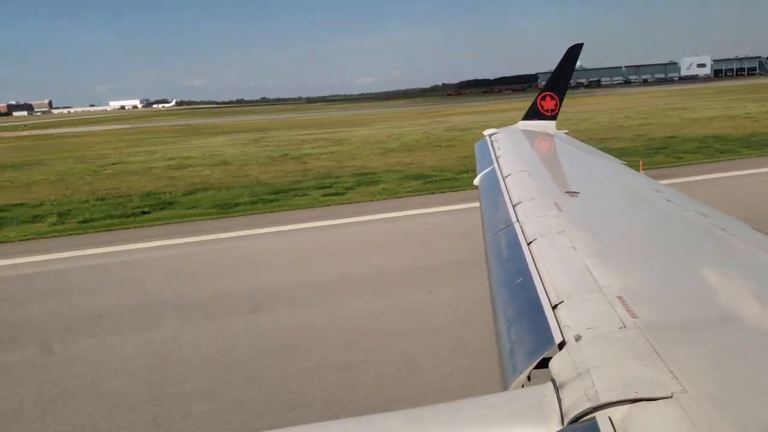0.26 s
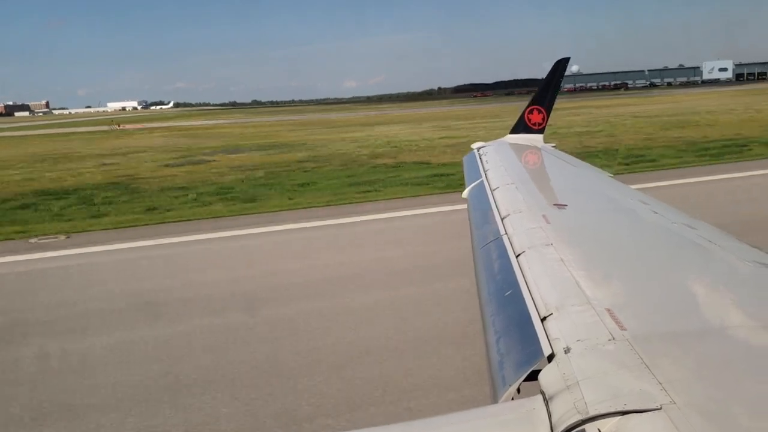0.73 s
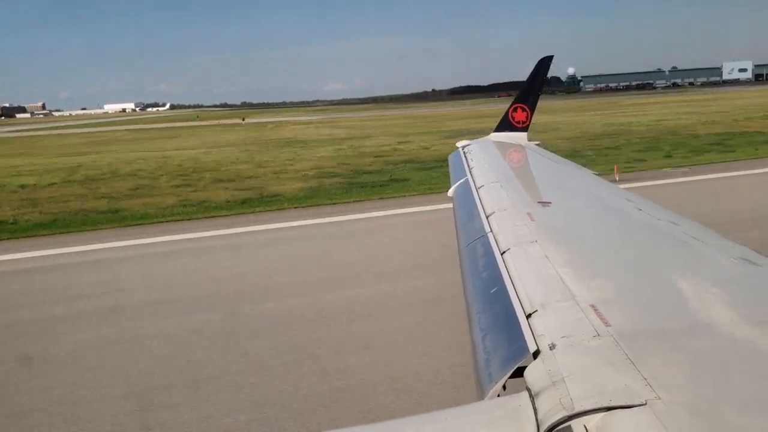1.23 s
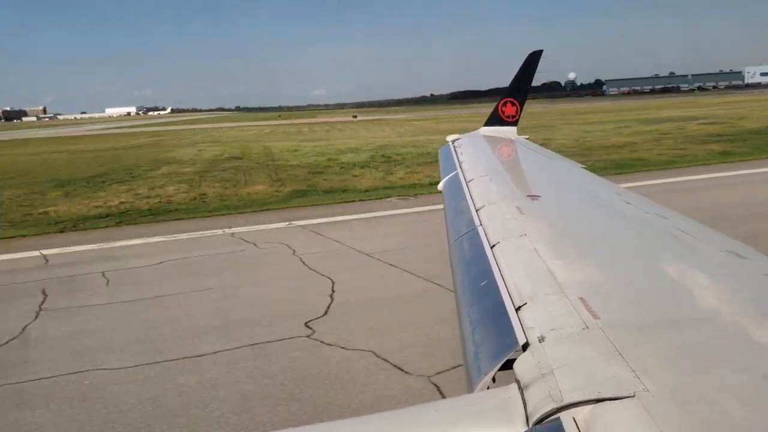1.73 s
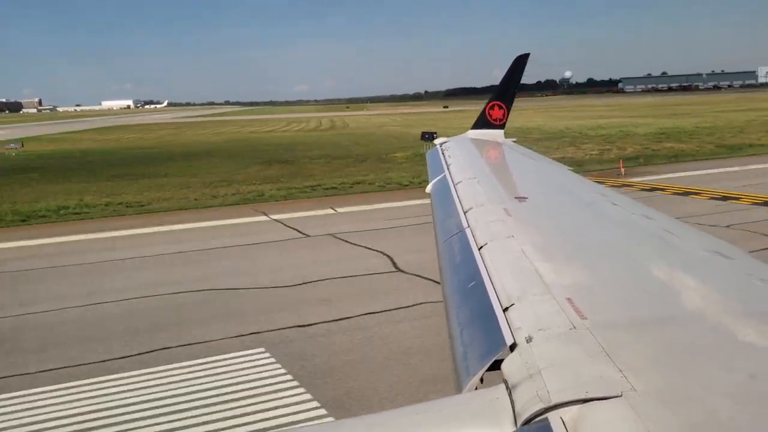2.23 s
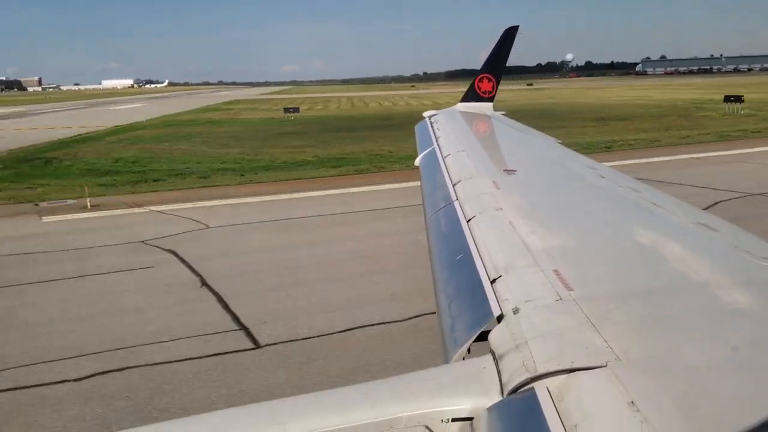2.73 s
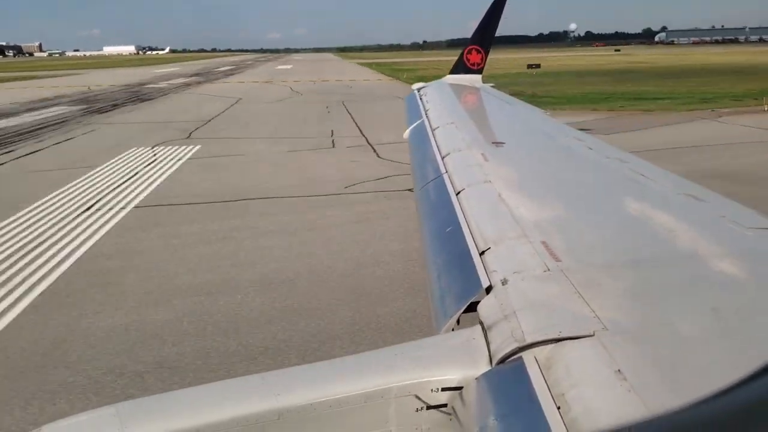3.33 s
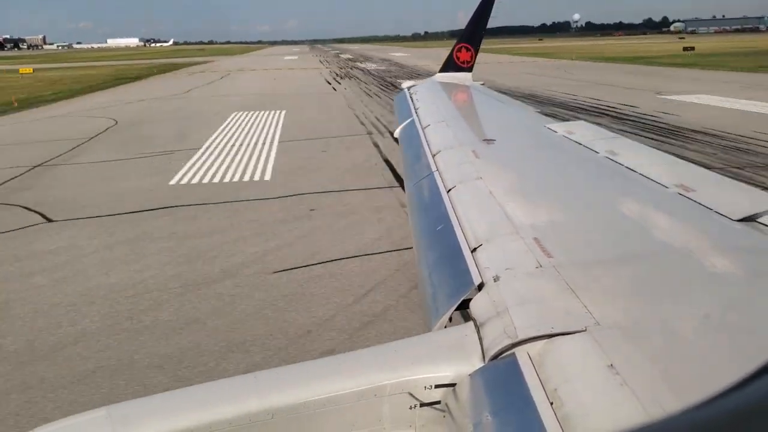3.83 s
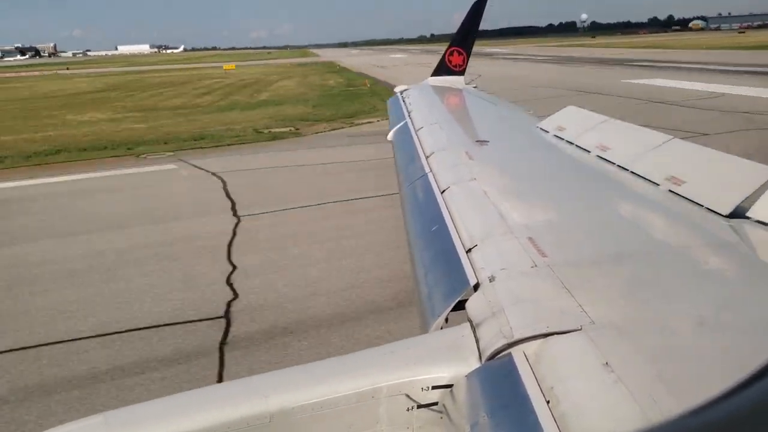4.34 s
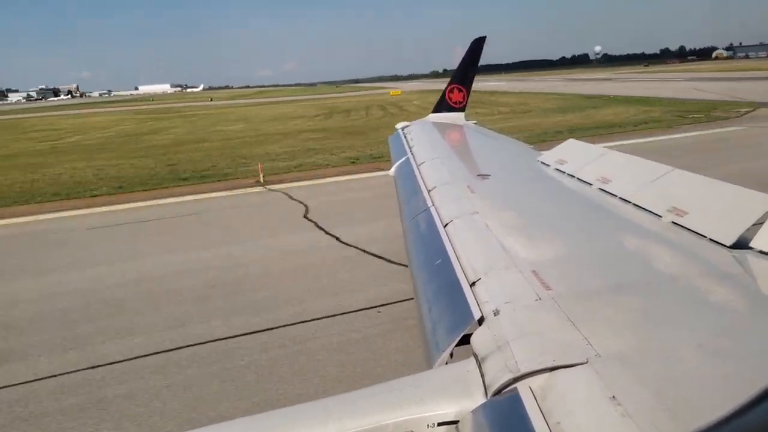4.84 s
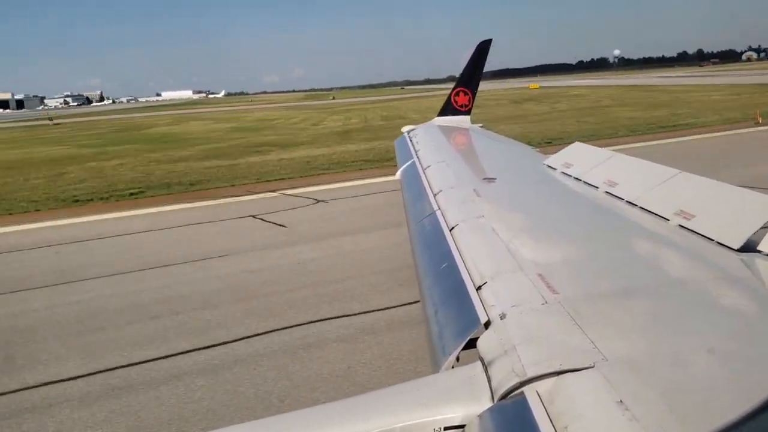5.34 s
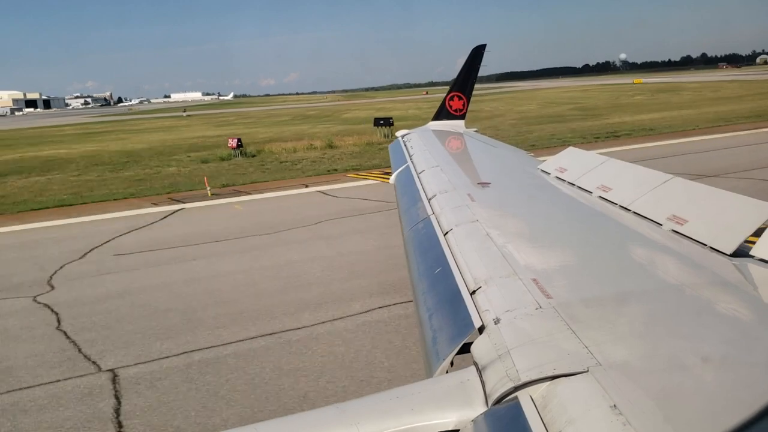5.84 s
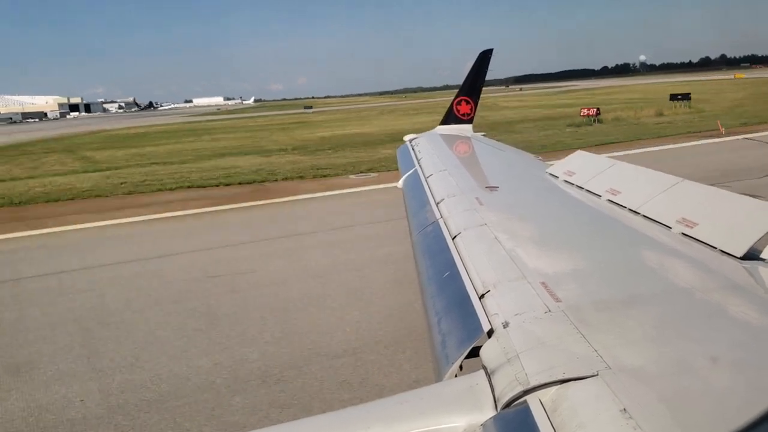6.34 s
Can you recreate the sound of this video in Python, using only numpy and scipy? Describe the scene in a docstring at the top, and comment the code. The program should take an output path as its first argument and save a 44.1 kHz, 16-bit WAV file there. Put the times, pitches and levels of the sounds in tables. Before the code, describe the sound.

Low hull booms and short thumps over steady engine rumble and airy hiss, with loose trim ticking left as an airliner rolls after landing.

```python
"""Jet cabin at touchdown

Heard beside the window through two microphone ports: the wheels roll and two low hull resonances boom unevenly.
Behind them, shaped noises make wheel roll, engine rumble, air along the skin, vents and hiss.
Faint sines are fan tones, most of them sinking late while some fade; fuzzy sines whistle on the left,
and short noise bursts are loose plastic trim ticking, mostly to the left."""
import sys
import numpy as np
from scipy import signal
from scipy.fft import rfft, irfft, next_fast_len
from scipy.io import wavfile
from scipy.ndimage import uniform_filter1d, map_coordinates

SR = 44100
rng = np.random.default_rng(int(sys.argv[2]) if len(sys.argv) > 2 else 0)


def to_wav(sig):
    """Store sig (one row per channel, or 1-D mono) as 16-bit WAV at the path in sys.argv[1].

    Samples outside -1..1 are clipped; the rate is SR.
    """
    pcm = np.clip(np.atleast_2d(sig), -1, 1) * 32767
    pcm = np.round(pcm).astype(np.int16)
    wavfile.write(sys.argv[1], SR, pcm.T)  # frames by channels


N = 289737  # samples


def amp(db):
    """Gain of a level in dB."""
    return 10 ** (np.asarray(db) / 20)


def unit(x):
    """x scaled to rms 1."""
    return x / np.sqrt(np.mean(x ** 2) + 1e-20)


def along(points, hz):
    """Read (frequency, value) points at hz, straight lines on a log frequency axis."""
    f, v = np.transpose(points)
    return np.interp(np.log(hz + 1), np.log(f + 1), v)


def spectrum(points):
    """Response whose gain in dB follows the points."""
    return lambda hz: amp(along(points, hz))


def curves(rows):
    """One value per sample for each column after the time."""
    time_s, *columns = np.transpose(rows)
    return [np.interp(np.arange(N) / SR, time_s, column) for column in columns]


def wobble(rate):
    """A smooth random curve with rate random knots a second."""
    knots = rng.standard_normal(int(N * rate / SR) + 4)
    return map_coordinates(knots, [np.arange(N) * rate / SR])


def filtered(x, response):
    """x shaped by a response of frequency, padded so that the end does not wrap round."""
    m = next_fast_len(N + SR // 2)
    shaped = rfft(x, m) * response(np.fft.rfftfreq(m, 1 / SR))
    return irfft(shaped, m)[..., :N]


# Likeness of broad noise at the two ports, columns: frequency_hz, likeness (1 = identical)
PORT_LIKENESS = [(60, 0.99), (130, 0.99), (250, 0.97), (400, 0.99), (600, 0.75), (900, 0.41), (1400, 0.19),
                 (3000, 0.094), (15000, 0.11)]


def rush(gain, patchy_db):
    """Turbulent noise, mid signal at rms 1: patches of random gain, and ports that agree most in the bass."""
    z = signal.stft(rng.standard_normal((2, N)), nperseg=512)[2]
    field = rng.standard_normal(z.shape[1:])
    field = uniform_filter1d(field, size=6, axis=0)
    field = uniform_filter1d(field, size=12, axis=1)
    patchy = z * amp(patchy_db * unit(field))
    pair = signal.istft(patchy, nperseg=512)[1][:, :N]

    def mid_side(hz):
        # a wider angle puts more of the noise in the side signal
        angle = np.arccos(np.clip(along(PORT_LIKENESS, hz), -1, 1)) / 2
        return gain(hz) * [np.cos(angle), np.sin(angle)]

    mid, side = filtered(pair, mid_side)
    return np.array([mid + side, mid - side]) / np.std(mid)


# Hiss spectrum, columns: frequency_hz, relative_level_db (per Hz)
HISS_SPECTRUM = [(4120, -29), (7000, -1), (7980, -8), (12300, 0), (15100, -2), (16000, -8.5)]
HISS_DB, HISS_GROWS = -68.5, 1.2  # mean level; swing in dB per dB of the vents


def hiss(vent_db, shudder):
    """The highest, thinnest noise, swinging a little wider than the vents."""
    level_db = HISS_DB + HISS_GROWS * (vent_db - vent_db.mean())
    return amp(level_db + .7 * shudder) * rush(spectrum(HISS_SPECTRUM), patchy_db=.5)


# Window recess and wall panels near the microphone, columns: pitch_hz, width_hz, level_db
RECESS_RESONANCES = [(830, 90, -8), (1040, 60, -7), (1640, 80, -8), (3680, 160, -6)]


def recess_lift(f):
    """Gain of the recess and panels: band-pass resonances added to the direct sound."""
    total = 1
    for pitch_hz, width_hz, level_db in RECESS_RESONANCES:
        damping = 1j * f * width_hz
        total = total + amp(level_db) * damping / (pitch_hz ** 2 - f * f + damping)
    return abs(total)


# Air vent spectrum, columns: frequency_hz, relative_level_db (per Hz)
VENT_SPECTRUM = [(1600, -37), (2700, -8), (3100, -3.5), (3700, -2), (4100, -1), (4400, -5.5), (5500, -9),
                 (6800, -14), (7200, -22.5), (7900, -28), (10300, -54.5), (17400, -120)]


def vents(vent_db, shudder):
    """Air vents: high turbulent noise coloured by the window recess."""
    noise = rush(lambda f: spectrum(VENT_SPECTRUM)(f) * recess_lift(f), patchy_db=1.0)
    return amp(vent_db + .29 * shudder) * noise


# Air along the skin, columns: frequency_hz, relative_level_db (per Hz)
AIR_SPECTRUM = [(380, -33.5), (650, -1.5), (737, -6.5), (840, -1.5), (970, -9.5), (1090, -4), (1270, -10),
                (1480, -10.5), (1680, -8.5), (2060, -9.5), (2640, -17.5), (2900, -23), (3770, -48),
                (6380, -120)]


def air_rush(air_db, shudder):
    """Boundary layer on the skin outside: middle-pitched noise coloured by the window recess."""
    noise = rush(lambda f: spectrum(AIR_SPECTRUM)(f) * recess_lift(f), patchy_db=.94)
    return amp(air_db + .16 * shudder) * noise


# Engine rumble through the hull, columns: frequency_hz, relative_level_db (per Hz)
RUMBLE_SPECTRUM = [(74, -30.5), (125, -3), (167, -8.5), (204, -6.5), (258, -16), (329, -20), (479, -25.5),
                   (533, -28), (611, -30), (649, -42.5), (760, -38.5), (990, -62.5), (1670, -120)]


def engine_rumble(rumble_db, shudder):
    """Engines: low noise, strongest between about 100 and 250 Hz."""
    return amp(rumble_db + .21 * shudder) * rush(spectrum(RUMBLE_SPECTRUM), patchy_db=.68)


# Broad noise at the window, columns: time_s, rumble_db, air_db, vent_db
FLOW_LEVELS = [(0, -26, -46.5, -55.5), (.42, -27.5, -46.5, -56.5), (.9, -26.5, -45, -54.5),
               (1.65, -26.5, -45.5, -54.5), (1.89, -23.5, -42.5, -51.5), (2.0, -24.5, -45, -54),
               (2.7, -25.5, -45, -54), (3.5, -26, -45, -53.5), (3.75, -27, -46, -55),
               (4.7, -27.5, -48, -55.5), (5.1, -28.5, -46.5, -55.5), (5.6, -28, -47.5, -56.5),
               (6.57, -26, -47.5, -54)]


def flow():
    """Engines, skin air, vents and hiss together, all moved by one shared random shudder."""
    rumble_db, air_db, vent_db = curves(FLOW_LEVELS)
    shudder = wobble(8)
    upper = hiss(vent_db, shudder) + vents(vent_db, shudder) + air_rush(air_db, shudder)
    return upper + engine_rumble(rumble_db, shudder)


# Faint engine tones, columns: pitch_hz, end_pitch_hz, level_db, halfway_level_db, end_level_db
FAN_TONES = [(602, 558, -53.5, -56, -66), (530, 487, -54.5, -45.5, -50), (496, 495, -52, -57, -62),
             (467, 450, -50.5, -51, -50)]
# Course from the first to the end values of the tones, columns: time_s, share (0-1)
TONE_COURSE = [(0, 0), (4.5, 0), (5.2, .48), (6.0, .85), (6.57, 1)]


def fan_tones():
    """Slightly unsteady sines, three of them sinking by different amounts late on, one nearly steady."""
    course, = curves(TONE_COURSE)
    out = np.zeros(N)
    for pitch_hz, end_pitch_hz, *levels_db in FAN_TONES:
        pitch = pitch_hz + (end_pitch_hz - pitch_hz) * course
        pitch = pitch * (1 + .0012 * wobble(5))
        level_db = np.interp(course, [0, .5, 1], levels_db) + 2.2 * wobble(4)
        out += amp(level_db) * np.sin(2 * np.pi * np.cumsum(pitch) / SR)
    return out


# Thin whistles on the left, columns: pitch_hz, start_s, end_s, level_db
WHISTLE_LINES = [(6830, 5.72, 6.15, -71), (6500, 6.25, 6.7, -67), (5500, 6.35, 6.7, -68),
                 (6230, 6.33, 6.5, -69)]


def whistles():
    """Fuzzy high sines that flicker in pitch and level, hardly reaching the right port."""
    t, out = np.arange(N) / SR, np.zeros(N)
    for pitch_hz, start_s, end_s, level_db in WHISTLE_LINES:
        fade = np.clip(np.minimum(t - start_s, end_s - t) / .08, 0, 1)
        pitch = pitch_hz * (1 + .0015 * wobble(40))
        phase = 2 * np.pi * np.cumsum(pitch) / SR
        out += amp(level_db + 4 * wobble(32)) * fade * np.sin(phase)
    return out * amp([[0], [-12]])  # left, right


# The clearer trim ticks, before pan and crack, columns: start_s, top_db, middle_db, body_db, t60_s
TRIM_TICKS = [(0.7215, -47, -44, -39.5, 0.046), (1.07, -54.5, -61.5, -58, 0.05),
              (1.5738, -68, -46, -33.5, 0.025), (1.6745, -57, -43, -55, 0.05),
              (1.9946, -43.5, -43.5, -45, 0.057), (2.7778, -47.5, -44.5, -39.5, 0.046),
              (2.817, -52.5, -41.5, -41.5, 0.056), (2.9345, -52.5, -36.5, -34, 0.06),
              (3.3428, -57.5, -59, -51.5, 0.025), (3.357, -46, -41.5, -46.5, 0.042),
              (3.4491, -47, -61, -57, 0.025), (3.4863, -61, -50, -45.5, 0.062),
              (3.738, -62.5, -56.5, -39, 0.022), (4.183, -56, -44.5, -44, 0.081),
              (4.219, -44, -38.5, -41.5, 0.068), (4.6856, -50, -48, -50, 0.024),
              (5.1357, -56.5, -59, -51.5, 0.1), (5.1468, -47.5, -39.5, -45.5, 0.074),
              (5.4114, -51.5, -48.5, -48, 0.076), (5.6663, -53, -44.5, -37, 0.066),
              (6.088, -48.5, -45.5, -45, 0.055), (6.1313, -60, -60.5, -51.5, 0.043),
              (6.1684, -51.5, -46, -39.5, 0.07), (6.2442, -55, -48, -46, 0.06),
              (6.4365, -59, -49.5, -45, 0.14)]
# Top of a tick, columns: frequency_hz, relative_level_db (per Hz)
SNAP_SPECTRUM = [(5000, -35), (7000, -2.5), (9000, -7), (12000, 3), (16000, -3.5)]
# Middle of a tick, columns: frequency_hz, relative_level_db (per Hz)
MIDDLE_SPECTRUM = [(2000, -41), (2700, -2), (3800, -0.5), (5000, -2.5), (6800, -4.5), (9000, -38)]
# Body of a tick, columns: frequency_hz, relative_level_db (per Hz)
BODY_SPECTRUM = [(450, -41), (800, -1), (1500, 1), (2500, -5), (3500, -43)]
TICK_PAN_DB, TICK_PAN_SCATTER_DB = 7.5, 1.8  # the trim sits to the left
FAINT_COUNT = 30  # fainter ticks come by chance
FAINT_DB, FAINT_SCATTER_DB, FAINT_T60_S = [-61.5, -60, -58], 4, .04  # levels: top, middle, body
TICK_RISE_S, CRACK_T60_S, CRACK_DB = .0012, .013, 1.5  # a short crack leads each tick
RAGGED_DB = 1.9


def trim_ticks():
    """Sharp, ragged noise bursts that the near walls draw out, scattered differently to each port."""
    size = SR // 10
    t = np.arange(size) / SR
    shape = np.zeros((3, 2, N + size))  # part, port, sample
    faint = []
    for _ in range(FAINT_COUNT):
        start_s = rng.uniform(0, N / SR)
        faint.append((start_s, *rng.normal(FAINT_DB, FAINT_SCATTER_DB), FAINT_T60_S))
    for start_s, top_db, middle_db, body_db, t60_s in [*TRIM_TICKS, *faint]:
        pan_db = rng.normal(TICK_PAN_DB, TICK_PAN_SCATTER_DB)
        lasting_s = max(t60_s, .005) * np.array([1, .8, .75])[:, None, None]  # lower parts stop sooner
        tail = amp(-60 * t / lasting_s)
        crack = amp(CRACK_DB - 60 * t / CRACK_T60_S)
        burst = (tail + crack) * (1 - np.exp(-t / TICK_RISE_S))
        shadow_db = pan_db * np.outer([1, .3, .3], [.5, -.5])  # the top is shaded most
        gain = amp(np.transpose([[top_db, middle_db, body_db]]) + shadow_db)
        first = round(start_s * SR)
        shape[..., first:first + size] += gain[..., None] * burst
    out = 0
    for part, colour in zip(shape[..., :N], (SNAP_SPECTRUM, MIDDLE_SPECTRUM, BODY_SPECTRUM)):
        ragged = rng.standard_normal((2, N)) * amp(RAGGED_DB * wobble(500))
        out = out + part * unit(filtered(ragged, spectrum(colour)))
    return out


# Wheel noise in the cabin, columns: frequency_hz, relative_level_db (per Hz)
ROLL_SPECTRUM = [(12, -42.5), (20, -15), (47, -1), (75, 0), (116, -3), (170, -20), (220, -38), (370, -120)]
# Low roll of the wheels, columns: time_s, level_db
ROLL_LEVELS = [(0, -29), (.55, -27.5), (.7, -22.5), (1.5, -23.5), (2.2, -25.5), (2.8, -21.5), (3.4, -22),
               (3.9, -22), (4.4, -21), (5, -23), (5.6, -18.5), (6.2, -22), (6.57, -23)]


def wheel_roll(roll_db):
    """Wheels on the ground: deep noise, strongest from about 50 to 120 Hz."""
    return amp(roll_db) * rush(spectrum(ROLL_SPECTRUM), patchy_db=0.0)


def surges(rows, rise_s, fall_s):
    """Pitch and level in dB of a resonance that swells, holds and dies away at each row."""
    t = np.arange(0, N / SR + .001, .001)
    start, length, hz, db = np.transpose(rows)[..., None]
    # start and end of a row fall at half amplitude
    edge = np.minimum((t - start) / rise_s + .5, (start + length - t) / fall_s + .5)
    swell = np.sin(np.pi / 2 * np.clip(edge, 0, 1)) ** 2
    size = np.max(amp(db) * swell, axis=0) + 1e-4
    pitch = uniform_filter1d(hz[np.argmax(edge, axis=0), 0], size=33)  # glide between rows
    return curves(np.transpose([t, pitch, 20 * np.log10(size)]))


def resonance(hz, db, drift_hz, flutter_db, rate):
    """A randomly driven resonance: one partial whose pitch and size never settle."""
    phase = 2 * np.pi * np.cumsum(hz + drift_hz * wobble(rate)) / SR
    return amp(db + flutter_db * wobble(rate)) * np.sqrt(2) * np.sin(phase)


# Thumps of the second hull resonance, columns: start_s, length_s, pitch_hz, level_db
HULL_THUMPS = [(1.35, .04, 106.1, -16), (1.65, 0.084, 98.2, -14), (1.92, .05, 97.6, -12.5),
               (2.43, 0.061, 101.1, -13), (2.77, 0.031, 100, -12), (3.03, .04, 100.5, -20.5),
               (3.29, 0.081, 112, -16.5), (3.53, .05, 102.9, -11), (3.62, 0.038, 103.2, -19),
               (3.76, .11, 98.58, -15.5), (4.07, 0.057, 98.76, -12), (4.25, 0.061, 104.2, -18.5),
               (4.41, 0.049, 90.9, -19), (4.94, .04, 95.5, -19), (5.14, .05, 96.47, -17.5),
               (5.63, 0.15, 92.8, -16), (5.99, .06, 94, -15), (6.16, .03, 107, -15.5),
               (6.23, .04, 97.6, -17)]
DRONE_HZ, DRONE_UNDER_DB = 102.75, -3.5  # level relative to the roll of the wheels


def hull_thumps(roll_db):
    """Second hull resonance: short thumps over a drone that follows the roll of the wheels."""
    pitch, level_db = surges(HULL_THUMPS, rise_s=.02, fall_s=.03)
    thumps = resonance(pitch, level_db, drift_hz=4.006, flutter_db=.4, rate=30)
    drone = resonance(DRONE_HZ, roll_db + DRONE_UNDER_DB, drift_hz=8.89, flutter_db=2.5, rate=18)
    return thumps + drone


# Lowest hull resonance, one boom per rough stretch under the wheels,
# columns: start_s, length_s, pitch_hz, level_db
HULL_BOOMS = [(0.3, .24, 58.36, -32), (0.63, .08, 56, -15.5), (0.73, .07, 60.5, -18.5),
              (0.85, .19, 61.5, -18.5), (1.08, .05, 60, -24), (1.18, .23, 60, -18), (1.46, 0.11, 59.3, -21),
              (1.59, 0.056, 56.2, -14), (1.76, .3, 59.85, -15.5), (2.17, 0.25, 61.6, -19),
              (2.45, .2, 61.4, -14.5), (2.69, .08, 59.5, -14), (2.87, .24, 59.6, -15.5),
              (3.17, 0.13, 59.2, -18), (3.35, 0.128, 57.4, -15.5), (3.53, 0.314, 57.36, -14.5),
              (4.09, 0.12, 63.74, -17.5), (4.25, .12, 65.26, -17.5), (4.42, 0.053, 65.7, -18),
              (4.56, 0.16, 59.27, -19), (4.74, .16, 58.8, -18.5), (5.02, .1, 57.7, -24),
              (5.14, 0.091, 59.9, -16.5), (5.38, 0.069, 57.6, -17.5), (5.48, 0.096, 55.96, -18),
              (5.76, 0.045, 56.13, -16), (5.84, 0.14, 57.3, -17.5), (6.02, 0.028, 54.9, -15),
              (6.12, 0.098, 59.55, -14.5), (6.26, 0.057, 61.5, -17), (6.4, 0.096, 63.3, -20)]


def hull_booms():
    """Lowest hull resonance: a wavering partial near 60 Hz that swells at each rough stretch."""
    pitch, level_db = surges(HULL_BOOMS, rise_s=.07, fall_s=.06)
    return resonance(pitch, level_db, drift_hz=1.2, flutter_db=.8, rate=12)


# Balance of the two microphone ports, columns: frequency_hz, left_over_right_db
PORT_BALANCE = [(60, 2), (200, 2), (330, 0.7), (500, 3), (770, 7), (1170, 6), (1800, 2), (2800, 0),
                (3600, 3), (4400, -1.5), (5300, -1.5), (6300, 3), (9800, 8.5), (15000, 0.5)]
PORT_LAG_S = .0002  # the left port leads


def through_ports(steady):
    """The unequal ports: half of the level and time difference goes to each side."""
    side = np.array([[.5], [-.5]])

    def response(f):
        lead = np.exp(2j * np.pi * side * f * PORT_LAG_S)
        return amp(side * along(PORT_BALANCE, f)) * lead

    return filtered(steady, response)


def scene():
    """Steady sound and hull through the unequal ports, with whistles and ticks on top."""
    roll_db, = curves(ROLL_LEVELS)
    hull = hull_thumps(roll_db) + hull_booms()  # the same for both ports before their balance and lag
    steady = flow() + fan_tones() + wheel_roll(roll_db) + hull
    return through_ports(steady) + whistles() + trim_ticks()


def record(dry):
    """The microphone loses the deepest bass; nothing from 15850 Hz up is kept."""
    return filtered(dry, lambda hz: (hz < 15850) / np.hypot(1, (38 / (hz + 1)) ** 2.4))


dry = scene()
out = record(dry)
to_wav(out)
```